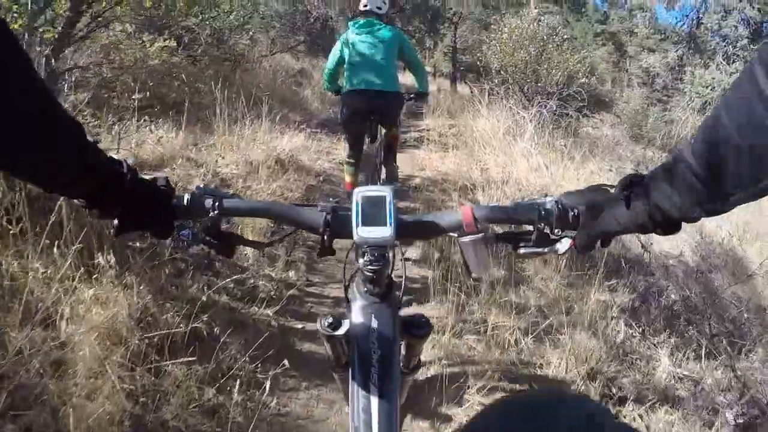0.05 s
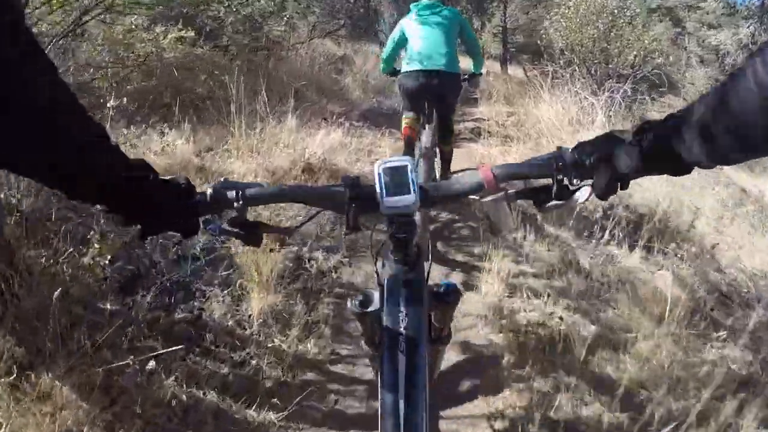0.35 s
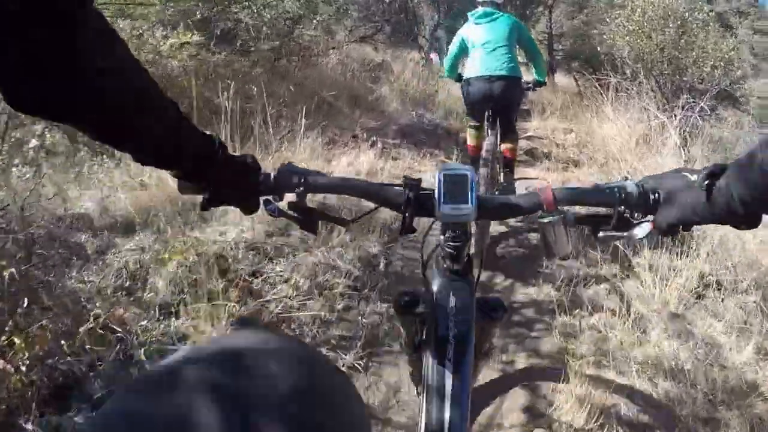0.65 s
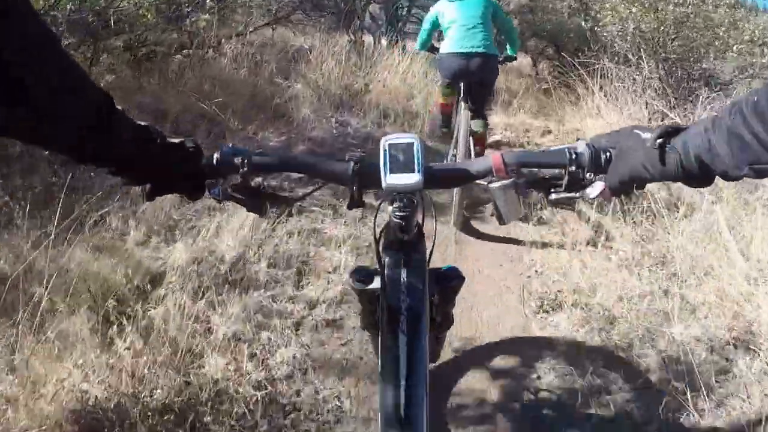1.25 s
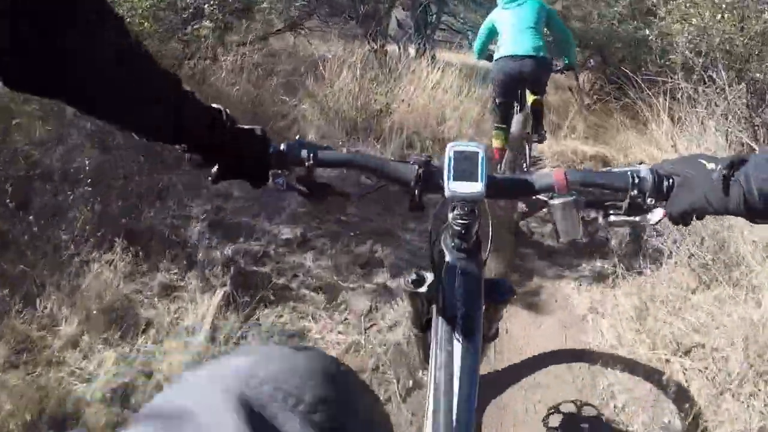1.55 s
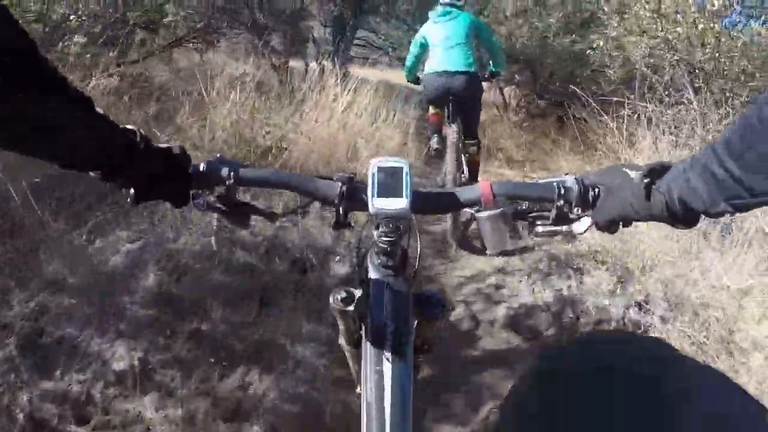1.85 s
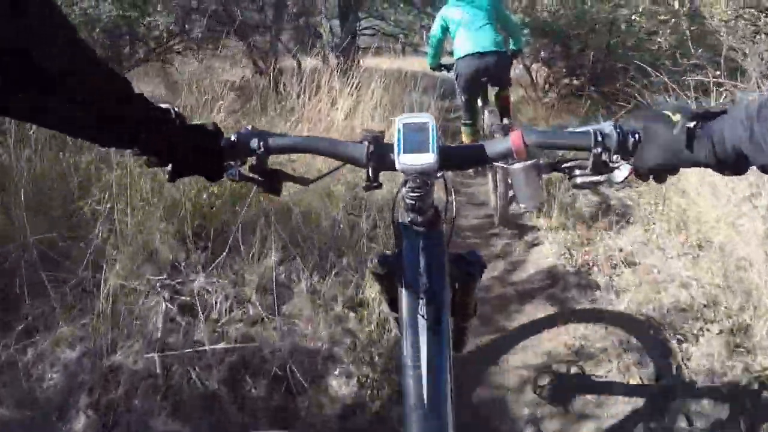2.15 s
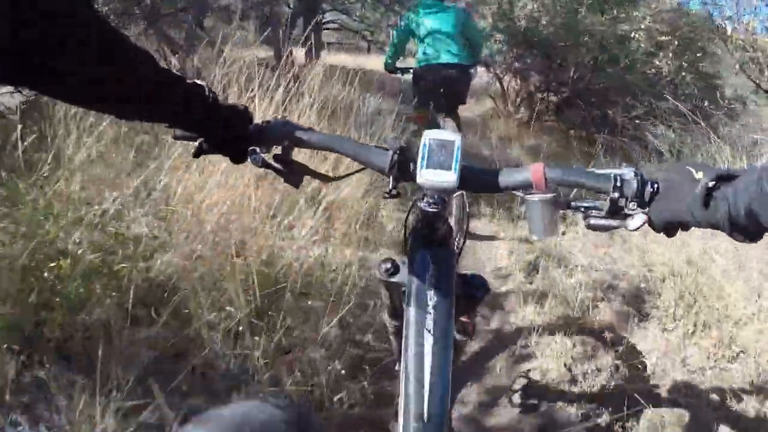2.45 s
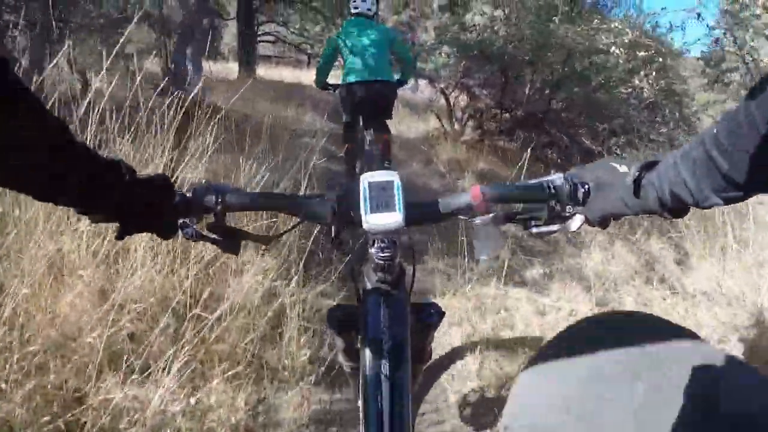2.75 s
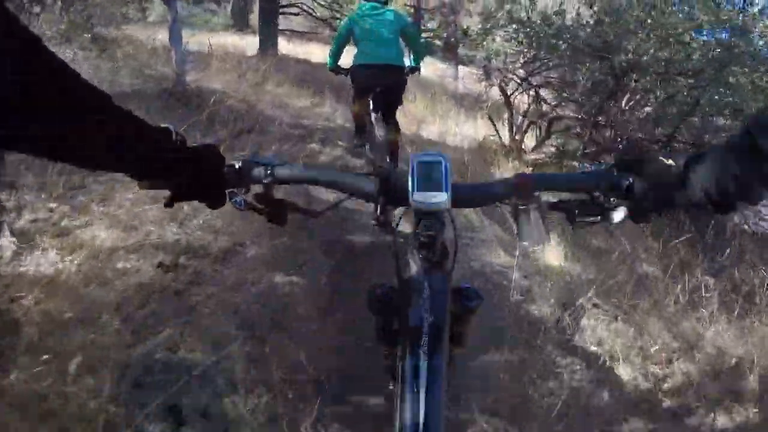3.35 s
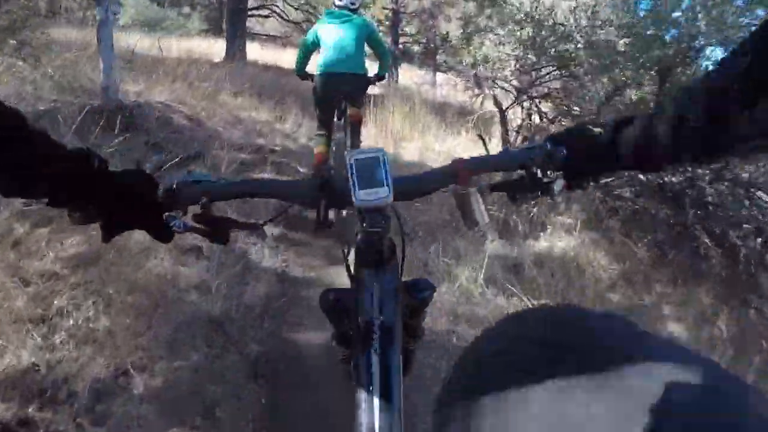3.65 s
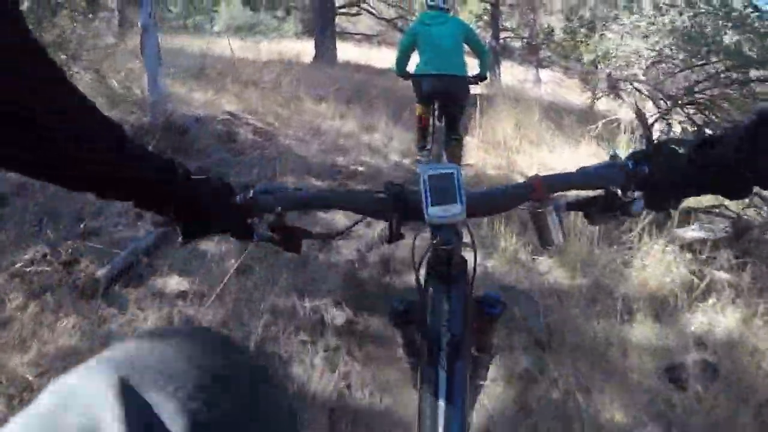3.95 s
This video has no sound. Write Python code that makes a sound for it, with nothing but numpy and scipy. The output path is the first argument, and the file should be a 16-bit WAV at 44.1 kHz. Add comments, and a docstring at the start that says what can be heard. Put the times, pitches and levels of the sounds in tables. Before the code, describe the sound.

A mountain bike rolls along a dry dirt trail, its tyres crunching softly over grit. Deep wind rumble and low pedalling thuds buffet a muffled chest-worn microphone, while sharp ticks and dull knocks come irregularly from the bike.

```python
"""Mountain bike on a dry dirt trail

Heard from a cased camera on the rider's chest. Wind and body sway rumble on the microphone
and swell with each pedal stroke. The tyres crunch over grit and scuff through dry grass.
Sharp ticks and dull knocks from the bike ring briefly in the case, which muffles the treble."""
import sys
import numpy as np
from scipy import signal
from scipy.fft import rfft, irfft
from scipy.io import wavfile
from scipy.ndimage import uniform_filter1d

SR = 44100
rng = np.random.default_rng(int(sys.argv[2]) if len(sys.argv) > 2 else 0)


def to_wav(sig):
    """Store sig (one row per channel, or 1-D mono) as 16-bit WAV at the path in sys.argv[1].

    Samples outside -1..1 are clipped; the rate is SR.
    """
    pcm = np.clip(np.atleast_2d(sig), -1, 1) * 32767
    pcm = np.round(pcm).astype(np.int16)
    wavfile.write(sys.argv[1], SR, pcm.T)  # frames by channels


N = 176400
T = np.arange(N) / SR


def from_db(db):
    """Decibels to gain."""
    return 10 ** (np.asarray(db) / 20)


def unit_rms(x):
    """Scale to unit power."""
    return x / np.sqrt(np.mean(x ** 2) + 1e-20)


def curve(rows):
    """Linear interpolation of (time_s, value) points."""
    return np.interp(T, *np.transpose(rows))


def butter(x, hz, kind="low", order=2):
    """Butterworth filter, low-pass by default."""
    return signal.sosfilt(signal.butter(order, hz, kind, fs=SR, output="sos"), x + 1e-18)


def drift(rate_hz):
    """Smooth random wander, unit RMS."""
    hop, settle = 40, 2000
    pole = np.exp(-2 * np.pi * rate_hz * hop / SR)
    white = rng.standard_normal(N // hop + settle + 2)
    slow = signal.lfilter([1], [1, -2 * pole, pole * pole], white)[settle:]
    return np.interp(np.arange(N) / hop, np.arange(len(slow)), unit_rms(slow))


def noise(spectrum):
    """Unit-power noise shaped by (freq_hz, level_db) points, rolled off beyond both ends."""
    hz, db = np.transpose(spectrum)
    bins_hz = np.maximum(np.arange(N // 2 + 1) * SR / N, 1)
    gain = from_db(np.interp(np.log(bins_hz), np.log(hz), db))
    skirts = np.minimum(bins_hz / hz[0], 1) ** 2 * np.minimum(hz[-1] / bins_hz, 1) ** 2
    return unit_rms(irfft(rfft(rng.standard_normal(N)) * gain * skirts, N))


def steady(x, span_s):
    """Flatten the envelope of a noise; unit power."""
    size = int(span_s * SR)
    power = np.abs(signal.hilbert(x)) ** 2
    smoothed = uniform_filter1d(uniform_filter1d(power, size), size)
    return unit_rms(x / np.sqrt(smoothed + 1e-9))


def swell_power(rows):
    """Summed power of Gaussian swells: centre_s, half_width_s, level_db."""
    return sum(from_db(db) ** 2 * np.exp(-np.minimum(((T - centre_s) / half_s) ** 2, 50))
               for centre_s, half_s, db in rows)


def impulses(rows):
    """One impulse per (start_s, level_db)."""
    out = np.zeros(N)
    for start_s, db in rows:
        out[int(np.clip(start_s * SR, 0, N - 1))] += from_db(db)
    return out


def ring(force, modes, vary_db=0):
    """Decaying modes, normalised by their total gain; vary_db lets each mode's drive wander."""
    out = 0
    for hz, db, t60_s in modes:
        radius = np.exp(-np.log(1000) / (t60_s * SR))
        real = radius * np.cos(2 * np.pi * hz / SR)
        drive = force * from_db(vary_db * drift(rate_hz=36)) if vary_db else force
        out += from_db(db) * signal.lfilter([1, -real], [1, -2 * real, radius ** 2], drive + 1e-18)
    return out / sum(from_db(db) for _, db, _ in modes)


# Hiss spectrum: freq_hz, density_db
HISS_SPECTRUM = [(300, -7), (3800, 7.5), (4800, -10), (5400, 7), (6200, 3), (7000, 5), (8500, 0),
                 (12500, -2.5), (14500, -11), (16000, -42)]


def hiss(level_db=-86.5):
    """Faint, steady noise floor."""
    return from_db(level_db) * noise(HISS_SPECTRUM)


# Wind and sway strength: time_s, level_db
WIND_LEVEL = [(.05, -38.5), (.13, -41.5), (.2, -47), (.27, -53), (.38, -41), (.45, -51), (.5, -42),
              (.6, -39), (.66, -51), (.73, -38), (.9, -56.5), (1.0, -44.5), (1.11, -42.5), (1.18, -46.5),
              (1.66, -47.5), (1.82, -39.5), (1.9, -31.5), (1.98, -39.5), (2.06, -54.5), (2.2, -35.5),
              (2.27, -42), (2.36, -38), (2.48, -33.5), (2.53, -45), (2.6, -52), (2.7, -41), (2.77, -44.5),
              (2.83, -44), (2.89, -51), (2.98, -45), (3.14, -39), (3.25, -46.5), (3.36, -59.5),
              (3.47, -39.5), (3.58, -50), (3.67, -39.5), (3.79, -48.5), (3.89, -39), (4.0, -46.5)]
# Buffeting spectrum: freq_hz, density_db
WIND_SPECTRUM = [(12, -2.5), (19, -7.5), (26, 5.5), (33, -3.5), (43, -10.5), (54, -25.5), (75, -37),
                 (120, -45.5)]


def wind():
    """Wind and body sway buffet the microphone with a deep rumble."""
    return from_db(curve(WIND_LEVEL)) * steady(noise(WIND_SPECTRUM), span_s=0.063)


# Pedal strokes: centre_s, level_db
PEDAL_STROKES = [(.205, -55), (0.724, -48), (1.231, -48), (1.716, -45), (2.206, -46), (2.713, -48.5),
                 (3.198, -41.5), (3.694, -46)]
# Frame shudders: centre_s, half_width_s, level_db
FRAME_SHUDDERS = [(.50, 0.031, -56.5), (.83, 0.023, -58), (.99, 0.033, -58.5), (1.29, 0.013, -52),
                  (1.5, 0.12, -66.5), (1.9, 0.0056, -51.5), (2.27, 0.034, -70), (2.45, 0.21, -60),
                  (2.955, 0.024, -48.5), (3.12, 0.0096, -54), (3.46, 0.02, -57), (3.6, 0.034, -59),
                  (3.95, 0.016, -63)]
# Body and frame rumble spectrum: freq_hz, density_db
THUD_SPECTRUM = [(35, -11.5), (55, -1), (72, 2.5), (100, -6.5), (160, -14), (250, -31.5), (500, -38)]


def body_thuds(half_width_s=0.011, pitch_hz=67.55, wander_hz=9.6, rustle_db=-11, floor_db=-64):
    """Each pedal stroke jolts the camera for a couple of cycles; rough ground makes it shudder."""
    jolt_power = swell_power([(centre_s, half_width_s, db) for centre_s, db in PEDAL_STROKES])
    sway_hz = pitch_hz + wander_hz * drift(rate_hz=18.6)
    sway = np.sqrt(2 * jolt_power) * np.sin(2 * np.pi * np.cumsum(sway_hz) / SR)
    rustle_power = jolt_power * from_db(rustle_db) ** 2
    rumble_power = rustle_power + swell_power(FRAME_SHUDDERS) + from_db(floor_db) ** 2
    return sway + np.sqrt(rumble_power) * steady(noise(THUD_SPECTRUM), span_s=0.022)


# Brake disc squeaks: centre_s, half_width_s, pitch_hz, level_db
DISC_SQUEAKS = [(1.242, .022, 7030, -87), (1.408, .008, 5380, -85), (2.668, .032, 7060, -94),
                (2.683, .007, 5300, -82), (2.895, .017, 7080, -91), (3.627, .008, 5500, -90)]


def brake_squeaks(waver_hz=170, chatter_db=4):
    """A disc grazes its pad and sings briefly on an unsteady pitch."""
    detune_hz = waver_hz * drift(rate_hz=280)
    chatter = unit_rms(from_db(chatter_db * drift(rate_hz=90)))
    out = 0
    for centre_s, half_s, hz, db in DISC_SQUEAKS:
        envelope = np.sqrt(2 * swell_power([(centre_s, half_s, db)]))
        out += envelope * np.sin(2 * np.pi * np.cumsum(hz + detune_hz) / SR)
    return chatter * out


# Cracks of stems and small stones: start_s, level_db, pitch_hz
STEM_SNAPS = [(.4875, -68, 5000), (0.535, -63, 7300), (0.5735, -60.5, 5800), (0.721, -59, 5700),
              (0.725, -66, 5800), (1.3605, -62, 5400), (2.9266, -58, 4960), (3.8436, -60.5, 6800)]


def snaps(decay_s=0.0033, width_octaves=0.52):
    """Stems and small stones crack in thin, bright bursts of band noise."""
    white = rng.standard_normal(N)
    edge_ratio = 2 ** (width_octaves / 2)
    out = 0
    for start_s, db, hz in STEM_SNAPS:
        envelope = (T >= start_s) * np.exp(-np.clip((T - start_s) / decay_s, 0, 20))
        out += from_db(db) * butter(envelope * white, [hz / edge_ratio, hz * edge_ratio], "band")
    return out


# Camera case resonances: freq_hz, gain_db, t60_s
CASE_MODES = [(1630, 3.5, 0.016), (1800, 4, 0.0098), (2207, 2, 0.0075), (2572, 4.5, 0.015),
              (3235, 3, 0.0092), (3470, -2.5, 0.015), (3650, -1.5, 0.017), (5100, -16.5, 0.004),
              (7130, -22, 0.0083), (11400, -23, 0.0052), (13100, -3.5, 0.0063)]


def camera_case(force, vary_db=0, split_hz=5000, treble_db=-14, leak_hz=900, leak_db=-6):
    """The case rings in its main band; weaker treble modes and a dull leak pass the wall too."""
    body = ring(force, [mode for mode in CASE_MODES if mode[0] < split_hz], vary_db)
    body = butter(body, hz=1480, kind="high", order=10)
    body = butter(body, hz=4000, order=10)
    treble = ring(force, [mode for mode in CASE_MODES if mode[0] >= split_hz])
    return body + from_db(treble_db) * treble + from_db(leak_db) * butter(force, leak_hz)


def thump(start_s, db, hz, delay_s=0.0008, rise_cycles=0.31):
    """A soft blow that swells and dies within about two cycles."""
    cycles = np.maximum(T - start_s - delay_s, 0) * hz
    age = np.minimum(cycles / rise_cycles, 60)
    return from_db(db) * age * np.exp(1 - age) * np.sin(2 * np.pi * cycles)


# Camera mount resonances: freq_hz, gain_db, t60_s
MOUNT_MODES = [(293, -16.5, 0.11), (430, -12, 0.0077), (550, 4, 0.012), (798, -8, 0.022),
               (984, -2.5, 0.026)]
# Contacts within one knock: delay_s, gain_db
KNOCK_CONTACTS = [(0, 0), (.0011, 4), (.0025, 4), (.0039, -4.5), (.0064, -5.5)]
# Knocks over bumps: start_s, mount_db, case_db, cutoff_hz, thump_db, thump_hz
BUMP_KNOCKS = [(0.1353, -78, -76, 885, -53, 420), (0.267, -64, -63, 2000, -70, 250),
               (.549, -65.5, -71, 2000, -76, 250), (.7252, -50.5, -41.5, 2300, -45, 135),
               (.841, -57, -57, 2600, -82, 197), (.980, -61.5, -64, 2600, -51, 160),
               (1.2694, -63, -62, 1020, -48, 174), (1.891, -62, -71, 2940, -63, 182),
               (2.6, -65, -64, 1500, -56, 298), (2.65, -59.5, -54, 2600, -70, 250),
               (2.9261, -52, -56, 1900, -41, 142)]


def knocks(ring_gain_db=2):
    """A quick rattle of contacts shakes the mount and the case, over a dull thump."""
    mount_force = case_force = thumps = 0
    for start_s, mount_db, case_db, cutoff_hz, thump_db, thump_hz in BUMP_KNOCKS:
        contacts = [(start_s + delay_s * rng.uniform(1.0, 1.05), db) for delay_s, db in KNOCK_CONTACTS]
        force = butter(impulses(contacts), cutoff_hz)
        mount_force += from_db(mount_db) * force
        case_force += from_db(case_db) * force
        thumps += thump(start_s, thump_db, thump_hz)
    return from_db(ring_gain_db) * (ring(mount_force, MOUNT_MODES) + camera_case(case_force)) + thumps


# Hard contacts of bike and stones: start_s, level_db, cutoff_hz
HARD_TICKS = [(0.0735, -56, 2500), (.189, -58.5, 2980), (.2326, -59, 4000), (0.2698, -51.5, 4030),
              (0.4872, -59, 4000), (0.5343, -50, 7000), (0.645, -58, 3000), (.7215, -50, 2800),
              (.7305, -45, 2200), (0.8474, -48, 3330), (0.9265, -47, 2000), (0.974, -52, 2460),
              (1.163, -54.5, 2500), (1.269, -35, 2160), (1.3612, -57.5, 6000), (1.5983, -49.5, 3000),
              (1.6476, -40.5, 3870), (1.878, -60, 3000), (1.8899, -47.5, 2800), (2.158, -53, 2900),
              (2.3813, -54.5, 7140), (2.4652, -33.5, 7660), (2.6508, -48, 3000), (2.698, -51.5, 2200),
              (2.9275, -45, 2190), (3.066, -56.5, 2970), (3.3555, -32, 9500), (3.449, -52, 3000),
              (3.4806, -49, 3500), (3.5176, -47, 3500), (3.5443, -51, 2800), (3.8142, -53.5, 2500)]


def ticks(gain_db=6, direct_db=-15, touch_lead_s=0.00093, touch_db=-15.5):
    """A light touch, then a hard hit, rings the case; each tick has its own brightness."""
    force = 0
    for start_s, db, cutoff_hz in HARD_TICKS:
        contacts = [(start_s - touch_lead_s, db + touch_db), (start_s, db)]
        force += butter(impulses(contacts), cutoff_hz, order=4)
    return from_db(gain_db) * (camera_case(force) + from_db(direct_db) * force)


def grain_force(per_s, spread_db, max_db, cutoff_hz=4400):
    """Randomly timed contacts under the tread, mostly small."""
    sizes = from_db(np.minimum(rng.exponential(spread_db, N), max_db))
    signs = rng.choice([-1, 1], N)
    hits = rng.random(N) < per_s / SR
    return butter(sizes * signs * hits, cutoff_hz)


def grit(per_s):
    """Crushed grains ring the case in changing colours; unit power."""
    return unit_rms(camera_case(grain_force(per_s, spread_db=2, max_db=8), vary_db=3.5))


def pebbles(gain_db=10):
    """Stray small stones click under the tread and ring the case."""
    return from_db(gain_db) * camera_case(grain_force(per_s=40, spread_db=1.5, max_db=4.5))


# Rolling strength: time_s, level_db
ROLL_LEVEL = [(.05, -66), (.18, -75.5), (.37, -72), (.55, -69.5), (.78, -69.5), (1.0, -69), (1.16, -71),
              (1.3, -69), (1.65, -72), (1.85, -70.5), (2.05, -74), (2.31, -66.5), (2.53, -71.5),
              (2.65, -67.5), (2.87, -71.5), (3.0, -72), (3.2, -69), (3.36, -73.5), (3.56, -67.5),
              (3.71, -74), (4.0, -67.5)]
# Rolling noise spectrum: freq_hz, density_db
ROLL_SPECTRUM = [(120, -3), (280, 8.5), (400, 0.5), (600, -2.5), (1100, -2), (1350, -4.5), (1600, -5),
                 (2300, -5.5), (3000, -10.5), (3700, -6), (4500, -14), (7000, -24), (15000, -29.5)]
# Scuffs through loose grit: centre_s, half_width_s, level_db
TYRE_SCUFFS = [(.077, 0.003, -73), (.488, 0.0047, -69), (.56, 0.026, -69), (.648, 0.01, -69.5),
               (.853, 0.0075, -68), (.927, 0.016, -70.5), (.99, 0.018, -67), (1.068, 0.0097, -67),
               (1.79, 0.016, -66.5), (1.889, 0.0083, -63.5), (2.32, 0.032, -72), (2.456, 0.0048, -62),
               (2.59, 0.0082, -66.5), (2.652, 0.003, -60.5), (2.71, 0.019, -84), (2.955, 0.037, -72),
               (3.478, 0.014, -66.5), (3.542, 0.023, -66), (3.62, 0.011, -69.5), (3.87, 0.011, -68),
               (3.985, 0.031, -70)]


def tyres(rush_db=-2, rush_flutter_db=0.8, grit_db=-13, grit_flutter_db=2.5,
          scuff_rush_db=-12, scuff_grit_db=-1):
    """Rolling tread makes a soft rush and a gritty crunch; both flare in the coarser scuffs."""
    roll_db = curve(ROLL_LEVEL)
    scuff_power = swell_power(TYRE_SCUFFS)
    roll_gain = from_db(roll_db + rush_db + rush_flutter_db * drift(rate_hz=60))
    rush_gain = np.sqrt(roll_gain ** 2 + from_db(scuff_rush_db) ** 2 * scuff_power)
    fine = from_db(roll_db + grit_db + grit_flutter_db * drift(rate_hz=63)) * grit(per_s=950)
    coarse = from_db(scuff_grit_db) * np.sqrt(scuff_power) * grit(per_s=550)
    return rush_gain * noise(ROLL_SPECTRUM) + fine + coarse + from_db(roll_db) * pebbles()


def scene():
    """Mono sum at the microphone."""
    return (wind() + body_thuds() + tyres() + ticks() + knocks() + snaps() + brake_squeaks() + hiss())[None]


def record(dry):
    """Brief silence, a quick fade-in and a steep cut of the top treble."""
    start_s, fade_s, stop_hz, stop_db = 0.036, 0.004, 16500, 50
    fade_in = np.clip((T - start_s) / fade_s, 0, 1)
    return signal.sosfilt(signal.cheby2(12, stop_db, stop_hz, fs=SR, output="sos"), dry * fade_in)


dry = scene()
out = record(dry)
to_wav(out)
```